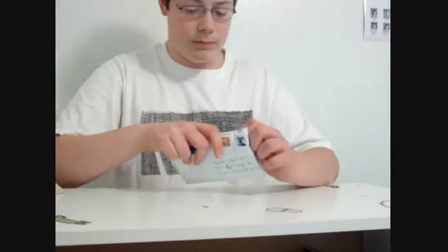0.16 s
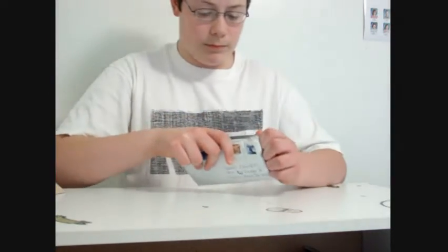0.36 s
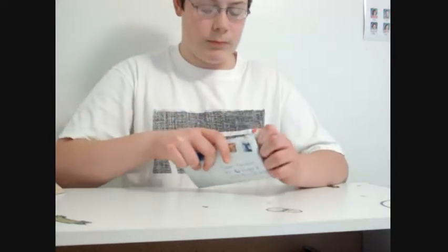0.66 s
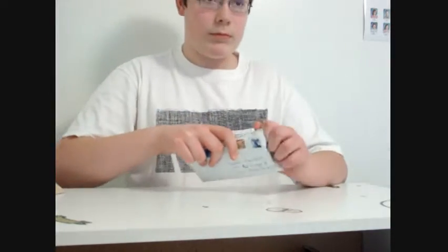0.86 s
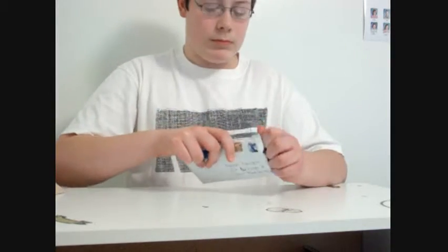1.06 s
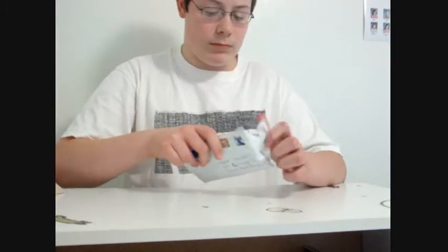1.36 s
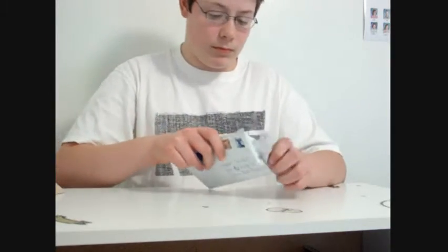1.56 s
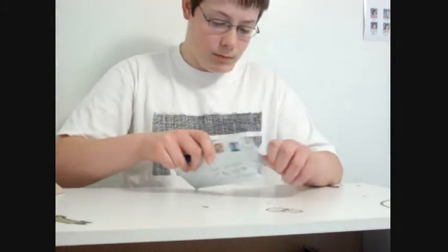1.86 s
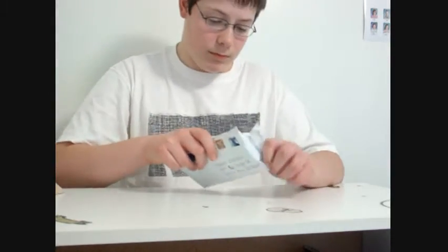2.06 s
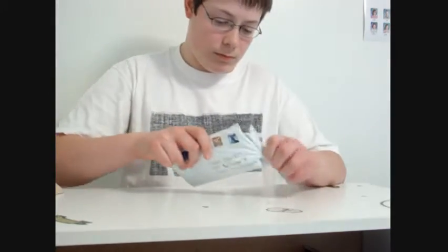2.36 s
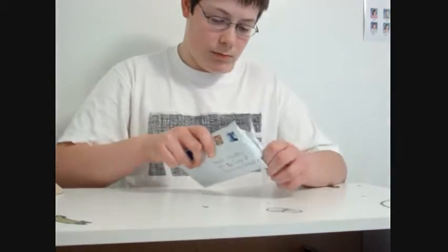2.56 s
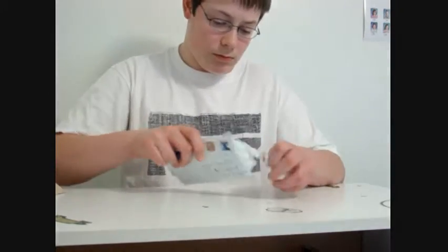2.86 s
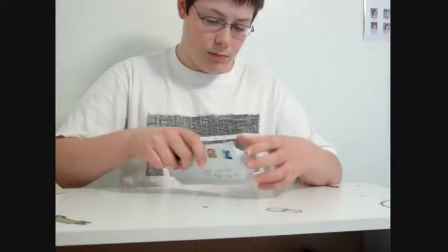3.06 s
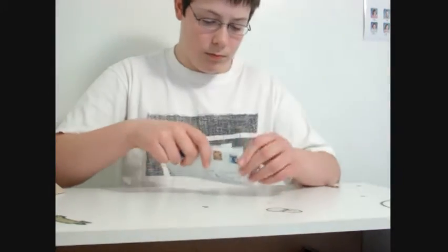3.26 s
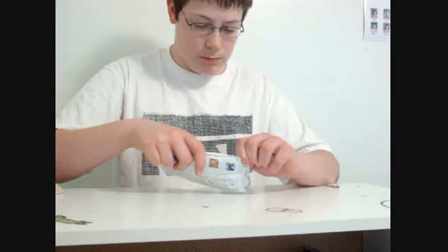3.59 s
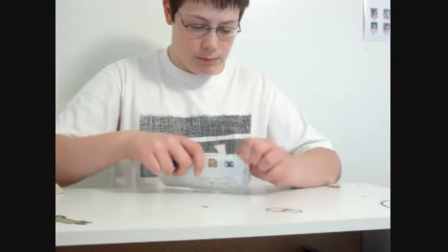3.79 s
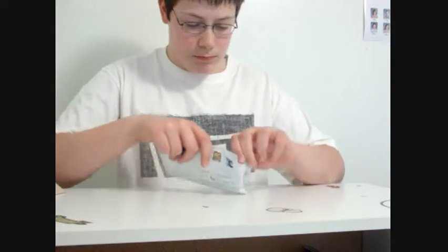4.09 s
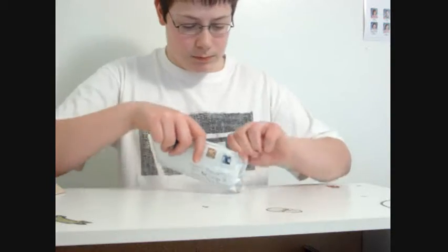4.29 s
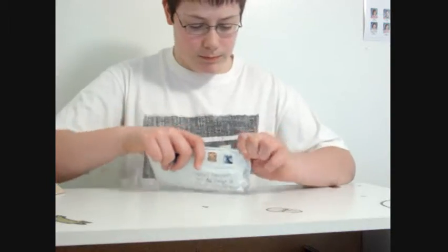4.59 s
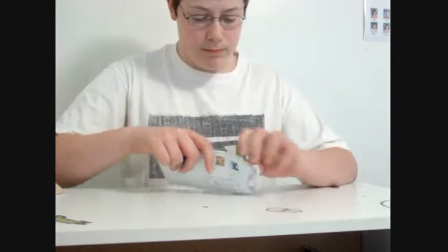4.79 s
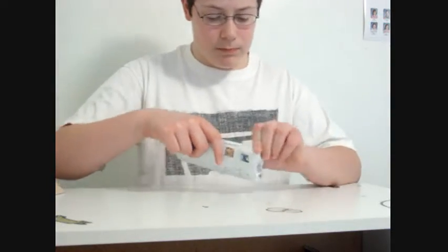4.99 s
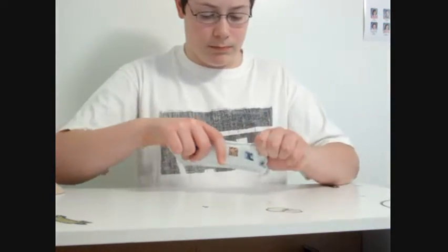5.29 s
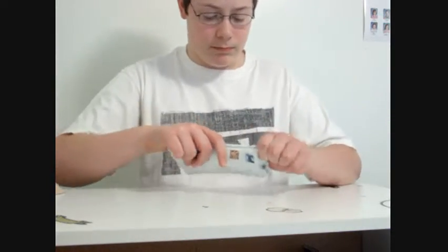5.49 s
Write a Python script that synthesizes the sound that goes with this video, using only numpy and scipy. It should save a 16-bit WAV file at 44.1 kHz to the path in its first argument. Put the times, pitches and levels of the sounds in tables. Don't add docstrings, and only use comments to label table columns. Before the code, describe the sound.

Hands work a paper envelope close to a cheap webcam microphone in a small quiet room. Light rustle and scattered crackles come first, then a brief tearing burst just after one second distorts the input with a puff of air. Dense creasing, tiny finger squeaks and soft knocks follow, ending in hard snaps and a forearm rub on the table.

```python
import sys
import numpy as np
from scipy import signal
from scipy.fft import rfft, irfft, next_fast_len
from scipy.io import wavfile
from scipy.ndimage import uniform_filter1d, map_coordinates

SR = 44100
rng = np.random.default_rng(int(sys.argv[2]) if len(sys.argv) > 2 else 0)


def linear_from_db(decibels):
    return 10 ** (np.asarray(decibels, float) / 20)


def to_wav(s):
    ch = np.atleast_2d(s).T
    pcm = np.round(np.clip(ch, -1, 1) * 32767)
    wavfile.write(sys.argv[1], SR, pcm.astype(np.int16))


N = 248724
TIME = np.arange(N) / SR

# start in seconds, peak in dB, brightness in dB, decay by 60 dB in seconds.
FOLD_SPILLS = [(.052, -27, -8, 0.37), (.187, -8.5, -10, 0.11), (.316, -26, -13, 0.26),
               (.819, -25, -8.5, 0.2), (.864, -12, -31, 0.047), (.913, -28, -3, 0.55),
               (1.459, -22, 4, 0.08), (1.467, -9, -35, 0.06), (1.665, -18.5, -12, 0.077),
               (1.708, -18.5, -35, 0.085), (1.818, -17, -3, 0.15), (1.845, -13, -6, 0.1),
               (1.85, -21, -2, 0.17), (1.986, -18, -14, 0.066), (2.008, -10, -25, 0.05),
               (2.208, -11, -5.5, 0.051), (2.334, -21.5, -17, 0.51), (2.407, -17.5, -10, 0.069),
               (2.424, -15, -3, 0.059), (2.529, -20.5, -6, 0.1), (2.553, -15, -9.5, 0.12),
               (3.406, -23, 5, 0.081), (3.42, -5.5, -35, 0.042), (3.525, -25, -9, 0.24),
               (3.819, -22.5, -2.5, 0.085), (4.894, -22.5, -9.5, 0.27), (4.976, -21, -6, 0.089),
               (5.164, -19.5, -6, 0.092), (5.518, -21, -3, 0.12), (5.525, -18, -6, 0.16),
               (5.581, -8, -30, 0.07), (4.261, -22, -8, .07), (4.085, -25, -15, .12), (.075, -24, -30, .1),
               (3.69, -24, -25, .08), (1.165, -30, -20, .1)]
CREASE_SPILLS = [(.174, -19.5, -9, 0.056), (.393, -22, -7.5, 0.075), (.539, -16, -16, 0.12),
                 (.559, -13, -4.5, 0.09), (.924, -23, -20, 0.2), (1.082, -16, -29, 0.044),
                 (1.359, -18.5, -4.5, 0.12), (1.592, -26.5, -9, 0.28), (1.612, -21, -7.5, 0.21),
                 (1.739, -19, -24, 0.13), (1.807, -21, -13, 0.077), (1.9, 0.5, -6.5, 0.062),
                 (1.907, -6.5, -5.5, 0.13), (2.177, -17.5, -10, 0.32), (2.267, -15.5, -10, 0.31),
                 (2.612, -24, -12, 0.12), (2.711, -12, -9.5, 0.1), (3.545, -18, -16.5, 0.41),
                 (3.626, -19, -11.5, 0.38), (3.667, 3, -28, 0.04), (4.102, -15.5, -13.5, 0.15),
                 (4.154, -19.5, -5.5, 0.12), (4.209, -26.5, -29, 0.42), (4.308, -12.5, -17, 0.13),
                 (4.329, -12.5, -12, 0.12), (4.918, -18.5, -10.5, 0.21), (5.221, -21, -8, 0.11),
                 (5.423, 3.5, -18.5, 0.084), (5.491, -11.5, -15, 0.033), (5.537, 0, -20, 0.04),
                 (5.58, 0, -26, .055), (.35, -34, 6, .07), (1.518, -33, 0, .05), (5.32, -24, 6, .04),
                 (2.016, -10, -3, .07), (3.972, -24, -10, .08), (2.258, -26, -8, .06),
                 (4.875, -28, -15, .08)]
CRINKLE_SPILLS = [(.085, -15.5, -3, 0.17), (.118, -18, -9.5, 0.11), (.326, -29, -34, 0.061),
                  (.467, -30, -4, 0.093), (1.111, -36, 15, 0.056), (1.198, 3, -2, 0.03),
                  (1.204, -10, -1, 0.019), (1.698, -13.5, -23, 0.12), (1.783, -22.5, -9, .12),
                  (1.929, -31, -7, .1), (2.014, -8, -10.5, 0.03), (2.68, -17.5, -16, 0.11),
                  (2.762, -20.5, -7, 0.12), (2.877, -32, 1, 0.065), (2.892, -5, -3, 0.14),
                  (3.444, -13, -2.5, 0.062), (3.481, -20, -4, 0.069), (3.746, -26, -16, 0.41),
                  (3.956, -14.5, -4, 0.077), (4.048, -28.5, -11, 0.49), (4.127, -18.5, -7.5, 0.19),
                  (4.264, -23.5, -11.5, 0.49), (4.501, -17, -30, 0.05), (4.584, -22.5, -15.5, 0.14),
                  (5.036, -18, -40, 0.034), (5.185, -19.5, -16, 0.07), (5.315, -24, 2, 0.04),
                  (5.352, -19, -25, 0.14), (5.409, -21, -5, 0.12), (5.631, -12, -8, 0.03),
                  (.685, -37.5, -4, 0.062), (2.31, -17.5, -15, 0.092), (2.35, -16.5, -15, 0.22),
                  (2.806, -36, 6, 0.052), (3.57, -12.5, -26, .08), (3.85, -35, 2, 0.053),
                  (3.877, -26, -20, 0.054), (4.484, -30, -5, 0.042), (5.45, -13, -5, 0.062),
                  (5.624, -22, 4, 0.022), (.775, -40, -8, 0.4), (1.435, -24, -20, .15),
                  (.95, -25, -12, 0.18), (2.69, -30, -10, .06), (2.37, -28, -8, .1), (4.385, -43, -22, .2)]
# time in seconds, effort in dB, brightness in dB.
FINGER_RUSTLE = [(0, -44, -3.5), (.64, -60, 13.5), (.76, -56.5, 4), (1.16, -42.5, -8.5), (1.65, -52, 2),
                 (1.85, -36, -5), (2.03, -51.5, 3), (3, -39.5, -3), (3.24, -49.5, -4.5), (3.33, -39.5, 0),
                 (3.53, -41.5, -1.5), (3.99, -47.5, 0.5), (4.18, -44.5, -8), (4.49, -50.5, 5),
                 (4.79, -44, -4.5), (5.06, -37, -3.5), (5.37, -42.5, 0), (5.64, -45, -21)]
# time in seconds, effort in dB, brightness in dB.
LONG_RIP = [(1.187, -57, -1), (1.195, -28, 8), (1.201, -21, -10), (1.212, -20.5, 6), (1.23, -17, 6),
            (1.245, -13, -7), (1.262, -16.5, -2), (1.279, -21.5, -1), (1.288, -29.5, -12), (1.32, -50, -4),
            (1.35, -66, -1)]
# fibres, body, upper fibres, edge, all in dB.
RUSTLE_MIX_DB = [-8.5, -13, -6, -2.5]
RIP_MIX_DB = [0.7, -12.5, -2, 0.9]
BRIGHTNESS_GAIN = np.array([[-.55], [-.6], [.1], [.55]])
# frequency in Hz, density in dB per Hz.
FIBRE_COLOUR = [(700, -25.5), (1150, -5.5), (1700, 2), (2300, -1), (3300, -15.5)]
BODY_COLOUR = [(90, -31.5), (220, -26), (420, 0), (800, 2), (1150, -2), (1700, -28)]
UPPER_COLOUR = [(1900, -26.5), (2700, -2.5), (3600, -2), (4700, -4), (6500, -19.5)]
EDGE_COLOUR = [(3300, -34), (4900, -4.5), (6500, -1.5), (8000, -1), (10000, -8)]
# start
# in seconds, peak in dB, centre in Hz.
SHARP_SNAPS = [(.087, -8, 8000), (.329, -9, 7280), (.5595, -8, 6110), (.9257, -11.5, 5500),
               (1.3616, -12, 3920), (1.469, -10, 1840), (1.821, -4, 5090), (1.851, -14, 6550),
               (1.9015, -9, 2270), (1.91, -3, 6000), (2.0179, -7, 4200), (2.201, -16, 2260),
               (2.21, -10, 5500), (2.2755, -10, 4300), (2.333, -19, 3820), (2.5563, -18, 4500),
               (2.687, -18, 2700), (2.714, -16, 2000), (2.895, -7, 4000), (3.423, -14, 1630),
               (3.447, -13, 6380), (3.67, -7, 1810), (3.962, -17, 5670), (4.1294, -12, 4000),
               (4.3105, -9.5, 3000), (5.316, -15, 4500), (5.428, -5, 3600), (5.5365, -9, 3000),
               (5.5835, -11, 1650), (5.6323, -11, 8000)]
GLUE_SNAPS = [(1.2002, 1, 2160), (1.2011, 2, 2600), (1.206, 3, 3100), (1.2068, 1, 1900), (1.2191, 3, 7500),
              (1.2196, 4, 7100), (1.2252, 2, 8380), (1.2257, 2, 7800), (1.2328, 2, 7000), (1.2385, 0, 1390),
              (1.2415, 1, 1390), (1.2445, 0, 1600), (1.2475, -2, 1500), (1.2522, -2, 1700),
              (1.2535, -1, 1400), (1.2585, -2, 1600), (1.267, -6, 2200), (1.2722, -7, 1900),
              (1.2785, -11, 7000), (1.2145, -5, 6500), (1.236, -2, 8500), (1.294, -14, 2400),
              (1.298, -17, 7600), (1.318, -22, 2500)]
PAPER_TICKS = [(0.1895, -14, 2290), (.468, -28, 6240), (0.5454, -26, 2100), (.868, -26, 1790),
               (1.1192, -21, 6800), (2.2262, -21, 5500), (2.3, -26, 1650), (2.408, -21, 2400),
               (3.82, -20, 2010), (4.109, -21, 1960), (4.5055, -27, 2700), (4.585, -24, 2500),
               (4.895, -19, 3700), (4.92, -27, 1920), (4.977, -20, 1940), (5.0377, -24, 2200),
               (5.186, -21, 1870), (5.2216, -21, 2300), (5.3534, -23, 2700), (5.4232, -8.5, 1920),
               (.5497, -27, 2000), (1.1128, -21, 6100), (1.907, -6, 5500), (1.9145, -6, 3000),
               (2.0195, -11, 3800), (2.213, -17, 1500), (2.278, -15, 4300), (2.285, -18, 1700),
               (2.3195, -21, 4800), (2.427, -22, 6500), (2.719, -21, 1700), (2.7695, -24, 2300),
               (2.7964, -23, 4900), (3.0268, -28, 2900), (3.254, -34, 4000), (3.548, -24, 1800),
               (3.575, -23, 1900), (3.5948, -21, 3000), (3.6279, -20, 3500), (3.752, -28, 3000),
               (3.878, -34, 2000), (4.0471, -27, 4900), (4.158, -21, 1900), (4.2827, -26, 1900),
               (4.3225, -21, 2500), (4.338, -19, 2000), (4.501, -36, 2700), (4.537, -33, 7700),
               (5.4365, -13, 2500), (5.626, -26, 4000),
               (.3411, -29, 1600), (.3937, -28, 2200), (.4714, -27, 6500), (.6602, -42, 7500),
                (.9076, -34, 8000), (1.0964, -34, 2000), (1.5251, -32, 6000), (1.741, -27, 2300),
                (1.7526, -25, 6000), (1.7545, -28, 2000), (1.8059, -27, 2000), (1.8924, -29, 5000),
                (1.9894, -25, 2000), (2.3356, -24, 4500), (2.3433, -22, 2600), (2.6809, -31, 2200),
                (3.2158, -35, 2000), (3.3958, -28, 6000), (3.7474, -29, 2500), (3.7917, -32, 2000),
                (3.8966, -31, 6000), (3.9547, -31, 2400), (4.0509, -29, 5500), (4.3147, -17, 4000),
                (4.4242, -37, 2100), (4.6828, -36, 6000), (4.8519, -31, 5500), (5.0103, -26, 4500),
                (5.3205, -19, 7000), (5.3964, -31, 1800), (5.5374, -16, 6000), (5.429, -8, 2800),
                (5.4335, -9, 7500), (5.634, -15, 1500)]
# start in seconds, length in seconds, pitch in Hz,
# end pitch in Hz, level in dB, overtones in dB, roughness (no unit).
FINGER_SQUEAKS = [
    (1.608, 0.024, 790, 860, -34, -7, 1),
    (2.069, 0.012, 810, 835, -43, -9, 1),
    (4.203, 0.016, 1650, 1450, -40, -30, .7),
    (4.218, 0.026, 1350, 1300, -39, -30, .5),
    (4.505, 0.028, 3470, 3430, -44, -29, .15),
    (4.53, 0.025, 3450, 3430, -58, -29, .2),
    (2.272, .042, 1650, 1600, -37, -30, 1),
    (5.589, .02, 850, 950, -27, -30, .6),
    (4.42, .04, 2050, 2000, -54, -30, 1.2),
]
# multiple of the pitch, level in dB.
SQUEAK_OVERTONES = [(2, 6), (3, 1), (4, -14)]
# time in seconds, level in dB.
FOREARM_RUB = [
    (5.3, -94),
    (5.36, -48),
    (5.44, -43),
    (5.51, -49),
    (5.64, -65),
]
# frequency in Hz, width in Hz, level in dB.
TABLE_MODES = [(209, 70, -14), (404, 120, -13.5)]
# start in seconds, pitch in Hz, level in dB.
HAND_THUMPS = [(.188, 534, -28.5), (1.206, 181, -34), (1.468, 470, -23.5), (1.47, 90, -55),
               (2.009, 716, -25), (2.205, 420, -30.5), (2.25, 70.6, -52), (2.4, 78.5, -50),
               (3.422, 810, -24.5), (3.668, 465, -21), (3.669, 169, -47.5), (4.311, 82.5, -54),
               (5.582, 810, -21.5), (5.6, 900, -32), (1.9, 700, -28), (1.4685, 1050, -25), (1.2, 560, -27),
               (1.235, 52, -46), (3.562, 600, -36), (3.58, 480, -38), (3.695, 500, -36), (1.48, 480, -32),
               (3.55, 477, -35), (5.394, 337, -37), (5.423, 476, -40), (5.427, 785, -55), (5.488, 420, -34),
               (2.99, 514, -41), (3.115, 605, -40), (3.155, 555, -42.5), (0.961, 544, -47),
               (3.527, 462, -37)]
# frequency in Hz, decay by 60 dB in seconds.
ROOM_DECAY = [(200, 0.15), (2000, 0.17), (9000, 0.098)]
# frequency in Hz, density in dB per Hz.
HUSH_COLOUR = [(15, -13), (109, 1), (450, -0.5), (770, -8.5), (1340, -8.5), (3920, -12), (7520, -48),
               (10500, -83)]
# start in seconds, lower edge in Hz.
TREBLE_HOLES = [(.044, 5000), (.076, 5000), (.456, 4500), (.535, 6000), (.546, 4800), (.67, 7000),
                (4.1335, 3500), (4.23, 5500), (.902, 3000), (1.099, 5000), (1.349, 2800), (1.728, 3500),
                (1.809, 4000), (1.888, 5500), (2.001, 3000), (2.253, 7500), (2.484, 6500), (2.65, 6500),
                (2.783, 6000), (2.86, 5000), (2.882, 1200), (3.275, 6000), (3.51, 5000), (3.802, 8000),
                (4.034, 5000), (4.243, 5000), (4.293, 5000), (4.522, 6500), (4.882, 3500), (5.304, 3000),
                (5.508, 2800), (5.569, 800), (5.612, 3500), (2.701, 5500), (2.734, 8000), (2.776, 6500),
                (2.798, 7000), (4.511, 5000), (4.573, 4500), (3.73, 3500), (3.86, 4000)]


def unit(x):
    return x / np.sqrt(np.mean(x ** 2) + 1e-20)


def along(points, hz):
    f, v = np.transpose(points)
    return np.interp(np.log(hz + 1), np.log(f + 1), v)


def curves(rows):
    s, *columns = np.transpose(rows)
    return [np.interp(TIME, s, column, -120, -120) for column in columns]


def wobble(rate):
    knots = rng.standard_normal(int(N * rate / SR) + 4)
    return map_coordinates(knots, [TIME * rate])


def filtered(x, response):
    m = next_fast_len(N + SR // 2)
    return irfft(rfft(x, m) * response(np.fft.rfftfreq(m, 1 / SR)), m)[..., :N]


def causal(x, spectrum):
    gain = linear_from_db(along(spectrum, np.fft.rfftfreq(4096, 1 / SR)))
    cepstrum = irfft(np.log(gain))
    cepstrum[1:2048] *= 2
    cepstrum[2049:] = 0
    pulse = irfft(np.exp(rfft(cepstrum)))
    return signal.fftconvolve(x, pulse / np.linalg.norm(pulse))[:N]


def paper():
    force = spills() * crackle(rate=650, spread_db=3.5, share=.22, clump_db=2.2, patchy_db=3.8)
    rustle = parts(FINGER_RUSTLE, RUSTLE_MIX_DB)
    force += rustle * crackle(rate=500, spread_db=4, share=.2, clump_db=1.9, patchy_db=3.0)
    rip = parts(LONG_RIP, RIP_MIX_DB)
    force += rip * crackle(rate=1200, spread_db=3, share=.3, clump_db=1.4, patchy_db=2.6)
    colours = (FIBRE_COLOUR, BODY_COLOUR, UPPER_COLOUR, EDGE_COLOUR)
    return snaps() + sum(causal(row, colour) for row, colour in zip(force, colours))


def spills():
    power, t = np.zeros((4, N + SR)), np.arange(SR // 4) / SR
    # events, body in dB, rise in seconds
    kinds = [(FOLD_SPILLS, -12.5, .0036), (CREASE_SPILLS, -19, .0027), (CRINKLE_SPILLS, -26.5, .0033)]
    for events, body_db, rise in kinds:
        for s, db, edge_db, t60 in events:
            part_db = np.array([[-15], [body_db - 5.0], [.5 * edge_db - 12.5], [edge_db - 4.5]])
            decay = linear_from_db(-60 * t / np.clip(t60, .02, .4))
            shape = decay * (1 - np.exp(-t / np.clip(rise, .0003, .02)))
            power[:, round(s * SR):][:, :len(t)] += (linear_from_db(db + part_db) * shape) ** 2
    return np.sqrt(power[:, :N])


def parts(rows, parts_db):
    db, bright = curves(rows)
    return linear_from_db(db + np.reshape(parts_db, (-1, 1)) + BRIGHTNESS_GAIN * np.clip(bright, -30, 30))


def crackle(rate, spread_db, share, clump_db, patchy_db):
    luck = rng.random((2, N))
    sizes = linear_from_db(-spread_db * np.log(luck[1] + 0.11))
    clicks = unit((luck[0] < rate / SR) * sizes)
    clicks = uniform_filter1d(clicks, size=24) * np.sqrt(24)
    share = np.clip(share, 0, 1)
    gain = np.sqrt(1 - share + share * clicks ** 2) * linear_from_db(clump_db * wobble(90))
    noise = patchy(rng.standard_normal((4, N)), patchy_db)
    return np.array([unit(row) for row in gain * noise])


def patchy(x, depth_db):
    z = signal.stft(x, nperseg=256)[2]
    field = uniform_filter1d(rng.standard_normal(z.shape), size=7, axis=-2)
    field = uniform_filter1d(field, size=4, axis=-1)
    return signal.istft(z * linear_from_db(depth_db * unit(field)), nperseg=256)[1][..., :N]


def snaps():
    out, t = np.zeros(N + SR), np.arange(SR // 20) / SR
    events = SHARP_SNAPS + GLUE_SNAPS + PAPER_TICKS
    for (s, db, hz), noise in zip(events, rng.standard_normal((len(events), len(t)))):
        ring = np.sin(2 * np.pi * hz * t) * np.exp(-hz * t / 1.4)
        crack = unit(uniform_filter1d(noise, size=1 + int(9000 / hz))) * linear_from_db(-60 * t / .007)
        snap = ring + .5 * crack
        out[round(s * SR):][:len(t)] += linear_from_db(db + .2) * snap / np.abs(snap).max()
    return filtered(out[:N], lambda f: (1j * f / (436 + 1j * f)) ** 2)


def squeaks():
    out = np.zeros(N)
    for s, length, hz, end_hz, db, over_db, rough in FINGER_SQUEAKS:
        u = np.clip((TIME - s) / length, 0, 1)
        pitch = (hz + u * (end_hz - hz)) * (1 + .03 * rough * wobble(300))
        phase = 2 * np.pi * np.cumsum(pitch) / SR
        tone = np.sin(phase) + sum(linear_from_db(d + over_db) * np.sin(k * phase) for k, d in SQUEAK_OVERTONES)
        out += linear_from_db(db + 3.3 * rough * wobble(310)) * np.sin(np.pi * u ** 0.73) * tone
    return out


def table():
    def modes(f):
        return sum(linear_from_db(db) * 1j * f * w / (c * c - f * f + 1j * f * w) for c, w, db in TABLE_MODES)

    rub, tremor = linear_from_db(-2.5 + curves(FOREARM_RUB)[0]), linear_from_db(-57.5)
    out = (rub + tremor) * unit(filtered(rng.standard_normal(N), modes))
    for s, hz, db in HAND_THUMPS:
        u = np.clip((TIME - s) * hz, 0, None)
        out += linear_from_db(db) * np.sin(2 * np.pi * u) * u * np.exp(1 - u / 1.13)
    return out


def puff():
    start_s, length_s, level_db = 1.205, .06, -32
    u = np.clip((TIME - start_s) / length_s, 0, None)
    return linear_from_db(level_db) * np.sin(2 * np.pi * u) * u * np.exp(1 - u * 2.1)


def room(x):
    hz, t, z = signal.stft(rng.standard_normal(SR // 2), SR, nperseg=256)
    decay = linear_from_db(-60 * t / along(ROOM_DECAY, hz)[:, None])
    tail = signal.istft(z * decay, SR, nperseg=256)[1]
    return signal.fftconvolve(np.pad(x, (130, 0)), tail / np.linalg.norm(tail))[:N]


def hush():
    return linear_from_db(-54 + 1.2 * wobble(6)) * causal(rng.standard_normal(N), HUSH_COLOUR)


def scene():
    near = paper() + squeaks() + table()
    return (near + linear_from_db(-14.0) * room(near) + puff() + hush())[None]


def starved(x, depth_db):
    hole_s, stray_share, stray_hz = .0105, .075, 4500
    hz, t, z = signal.stft(x, SR, nperseg=128)
    hole = np.zeros(z.shape[1:])
    for s, edge_hz in TREBLE_HOLES:
        hole += np.outer(np.clip((hz - edge_hz) / 1200 + .5, 0, 1), (t > s) & (t < s + hole_s))
    cells = rng.random((len(hz) // 3 + 1, len(t) // 8 + 1)) < stray_share
    cells = cells.repeat(3, 0).repeat(8, 1)[:len(hz), :len(t)]
    hole += .9 * cells * (hz[:, None] > stray_hz)
    uneven = uniform_filter1d(2 * rng.random(hole.shape), size=3, axis=0)
    return signal.istft(z * linear_from_db(-depth_db * hole * uneven), SR, nperseg=128)[1][:, :N]


def splatter(x):
    low_hz, high_hz, shift_hz = 11900, 15600, 5800
    air = filtered(x, lambda hz: hz > low_hz - shift_hz) * np.cos(2 * np.pi * shift_hz * TIME)
    air = air * np.sqrt(np.abs(uniform_filter1d(air ** 2, size=60))) / .2
    air = air * (uniform_filter1d(x ** 2, size=2600) > linear_from_db(-16) ** 2)
    return linear_from_db(-24.5) * filtered(air, lambda hz: np.clip(np.minimum(hz - low_hz, high_hz - hz) / 300, 0, 1))


def low_pass(x):
    return signal.sosfilt(signal.butter(12, 15500, fs=SR, output="sos"), x)


def record(dry):
    top_hz = 10150
    x = starved(dry, depth_db=16.0)
    x = filtered(x, lambda hz: hz < top_hz)
    x = x / (1 + np.abs(x / .84) ** 6) ** (1 / 6)
    x = filtered(x, lambda hz: np.clip((top_hz - hz) / 150, 0, 1))
    return low_pass(x + splatter(x))


dry = scene()
out = record(dry)
to_wav(out)
```